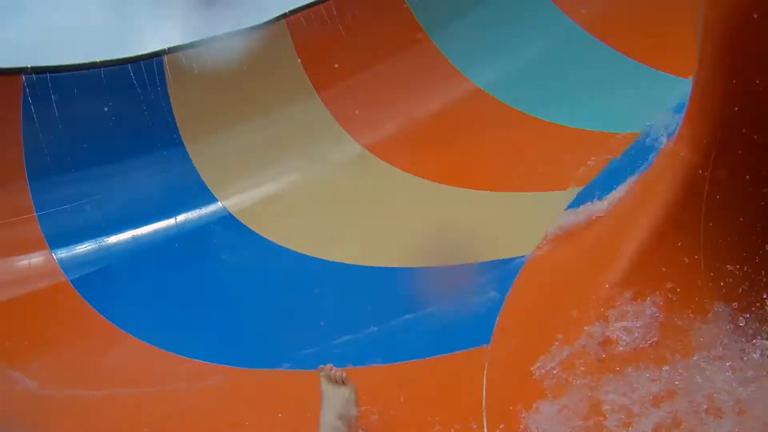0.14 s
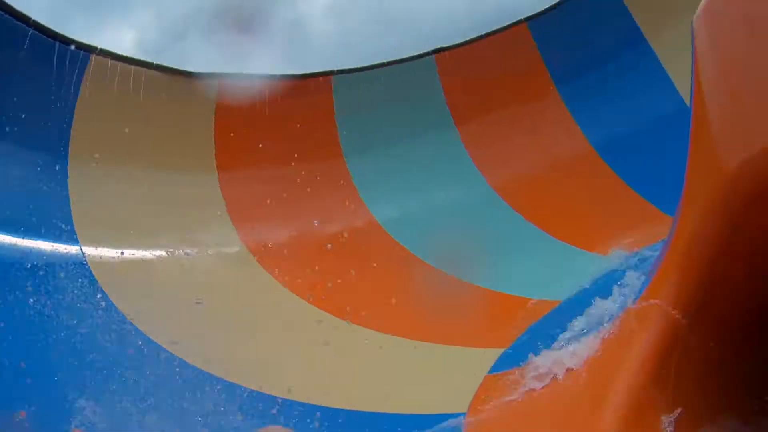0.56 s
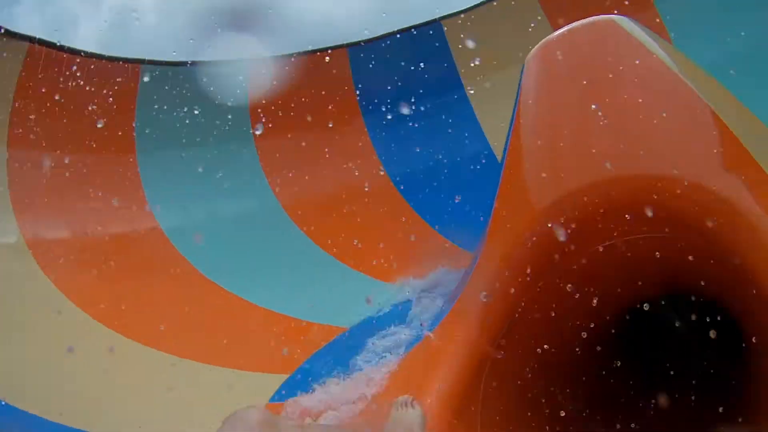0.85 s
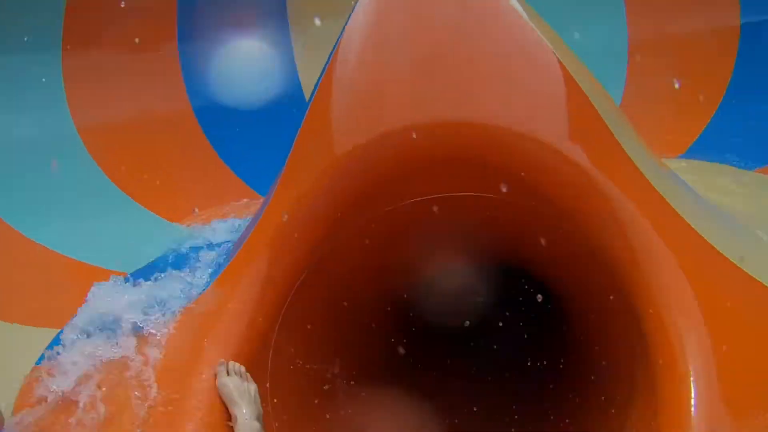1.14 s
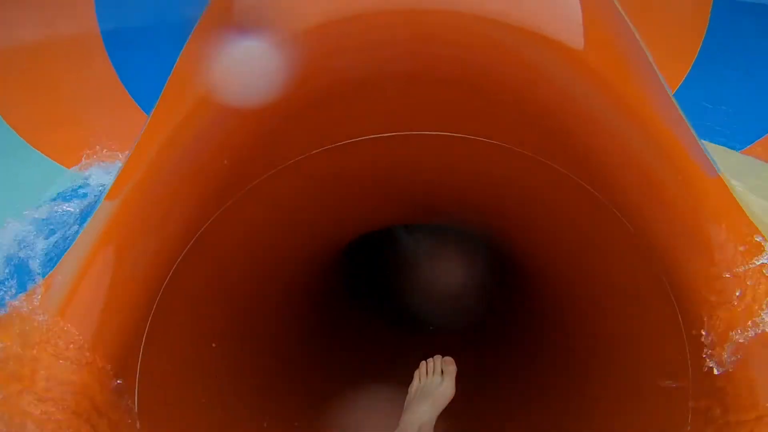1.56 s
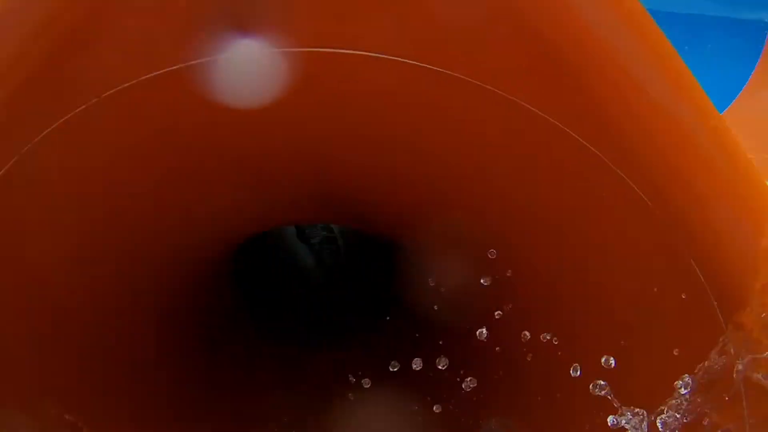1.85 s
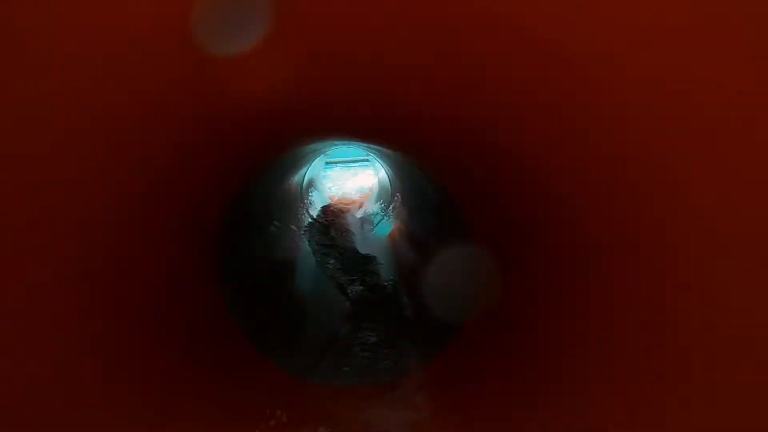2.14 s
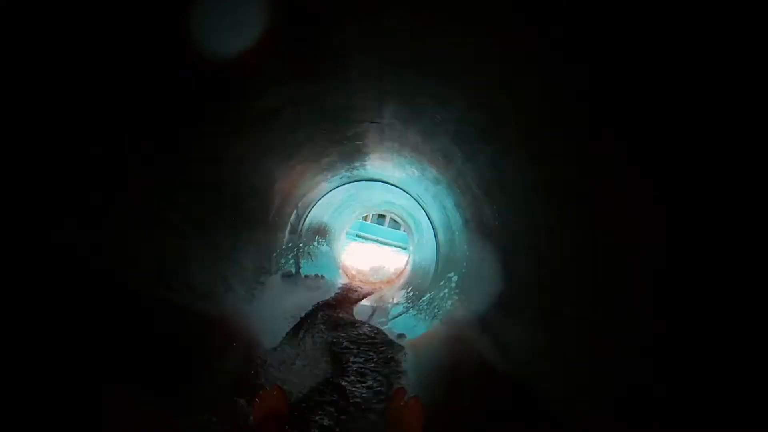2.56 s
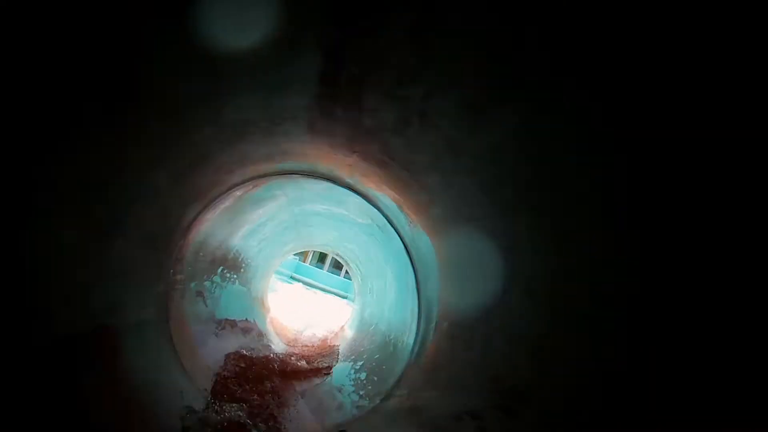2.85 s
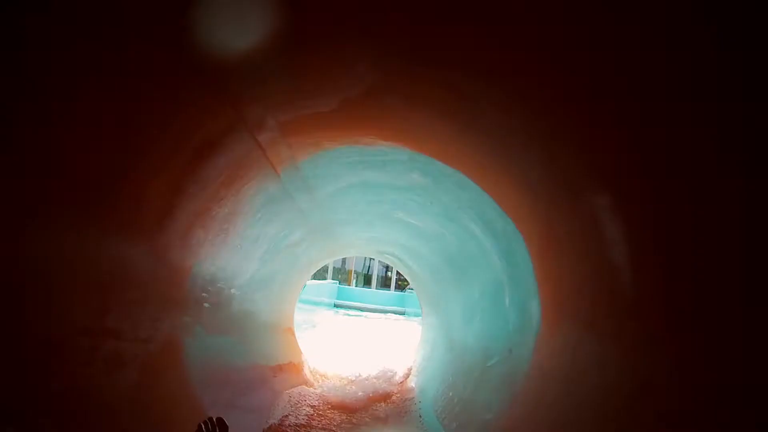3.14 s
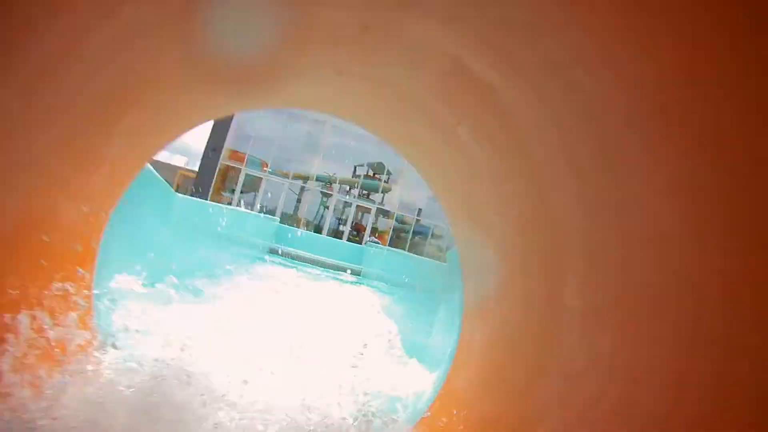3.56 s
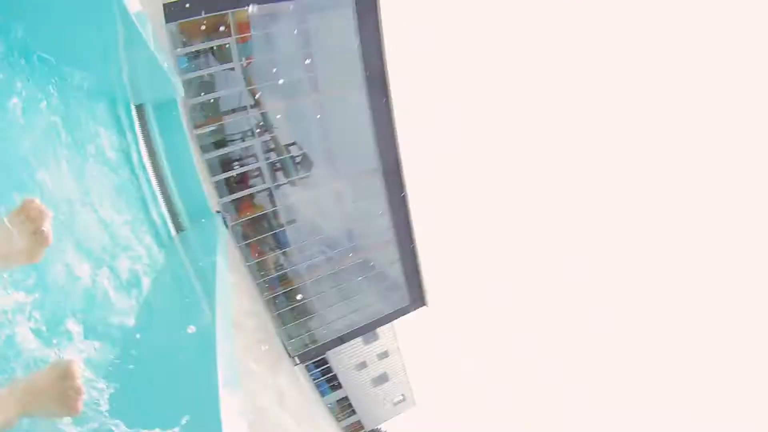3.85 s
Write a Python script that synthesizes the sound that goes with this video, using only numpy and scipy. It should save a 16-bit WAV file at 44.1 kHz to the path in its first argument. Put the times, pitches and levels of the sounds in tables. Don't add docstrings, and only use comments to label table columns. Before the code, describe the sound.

Water rushes as a bright, grainy hiss over a duller wash, close in a waterproof camera's microphone. Brief muffled gaps and soft thumps come around 0.2-0.4 s, with tiny ticks near 0.7-1.3. From 1.6 the rush swells, chopped by gurgling dropouts, densest at 2.0-2.4. It steadies, surges sharply at 3.4, then hard popping splashes crackle at 3.75-3.95, leaving muffled, stuttering water.

```python
import sys
import numpy as np
from scipy import signal
from scipy.fft import rfft, irfft, next_fast_len
from scipy.io import wavfile
from scipy.ndimage import uniform_filter1d, map_coordinates

SR = 44100
rng = np.random.default_rng(int(sys.argv[2]) if len(sys.argv) > 2 else 0)


def transcribe(u):
    v = np.clip(np.atleast_2d(u).T, -1, 1)
    q = np.round(v * 32767).astype(np.int16)
    wavfile.write(sys.argv[1], SR, q)


def linear_from_db(decibels):
    return 10 ** (np.asarray(decibels, float) / 20)


N = 176400
TOP_HZ = 14050

# center_hz, width_hz, lift_db
FLOODED_PORT = [(4300, 900, 1.7), (6600, 2200, 10.4)]


def unit(x):
    return x / np.sqrt(np.mean(x ** 2) + 1e-20)


def along(points, hz):
    point_hz, point_db = np.transpose(points)
    return np.interp(np.log(hz + 1), np.log(point_hz + 1), point_db)


def wobble(rate):
    knots = rng.standard_normal(int(N * rate / SR) + 4)
    return map_coordinates(knots, [np.arange(N) * rate / SR])


def filtered(x, response):
    size = next_fast_len(N + SR // 2)
    return irfft(rfft(x, size) * response(np.fft.rfftfreq(size, 1 / SR)), size)[..., :N]


def gate(rows, in_ms, out_ms):
    t, out = np.arange(N) / SR, np.zeros(N)
    for start_s, length_ms, height in rows:
        end_s = start_s + length_ms / 1000
        near = slice(max(round(start_s * SR) - 400, 0), round(end_s * SR) + 400)
        inside = 1000 * np.minimum((t[near] - start_s) / in_ms, (end_s - t[near]) / out_ms)
        out[near] += height * np.clip(inside + .5, 0, 1)
    return out


def rush():
    # time_s, level_db
    ride_levels = [(0, -53), (.5, -55.5), (1.1, -57), (1.55, -53.5), (1.8, -49.5), (2.0, -45.5),
                   (2.4, -46.5), (2.9, -47.5), (3.2, -50.5), (3.3, -46), (3.422, -47), (3.428, -36.5),
                   (3.482, -39), (3.505, -41), (3.75, -44.5), (3.8, -52.5), (3.86, -55), (4, -52)]
    # freq_hz, level_db
    spray_color = [(1700, -48), (2300, -10.5), (2600, -6.5), (3000, -4.5), (4500, -7.5), (6000, -5.5),
                   (9000, -3), (14000, -11.5)]
    # freq_hz, level_db
    body_color = [(25, -8), (190, -17), (450, -12.5), (900, -12.5), (1450, -9), (1700, -18), (2200, -19),
                  (3500, -99)]
    # center_hz, width_hz, lift_db
    open_port = [(3340, 290, 2), (5473, 790, 12), (6785, 310, 8), (9130, 2200, 2.5)]
    landing_s = 3.756
    fizz_per_s, fizz_db, fizz_spread_db = 900, -9.5, 6

    t = np.arange(N) / SR
    level_db = np.interp(t, *np.transpose(ride_levels)) + .5 * wobble(5.14) + 1.3 * wobble(30.33)
    loss_db = film_loss_db() * (1 + 0.17 * wobble(150))

    grain_size = linear_from_db(fizz_spread_db * np.minimum(rng.exponential(size=N), 3))
    fizz = (rng.random(N) < fizz_per_s / SR) * rng.standard_normal(N) * grain_size
    source = unit(patchy(patchy_db=1.0)) + linear_from_db(fizz_db) * unit(fizz)

    def through(modes):
        return unit(filtered(source, lambda f: linear_from_db(along(spray_color, f)) * port(f, modes) * (f < TOP_HZ)))

    spray = np.where(t < landing_s, through(open_port), through(FLOODED_PORT))
    body = unit(filtered(patchy(patchy_db=1.5), lambda f: linear_from_db(along(body_color, f))))
    spray, body = hollowed(np.array([spray, body]))

    body_db = -65 + 0.88 * (level_db + 49) + 0.42 * wobble(16)
    return linear_from_db(level_db - loss_db) * spray + linear_from_db(body_db - 0.48 * loss_db) * body


def patchy(patchy_db):
    z = signal.stft(rng.standard_normal(N + 512), nperseg=256)[2]
    field = uniform_filter1d(uniform_filter1d(rng.standard_normal(z.shape), 5, 0), 12, 1)
    return signal.istft(z * linear_from_db(patchy_db * unit(field)), nperseg=256)[1][:N]


def port(f, modes):
    ringing = 0
    for center, width, lift_db in modes:
        ringing = ringing + np.abs(linear_from_db(lift_db) - 1) * 1j * f * width / (center ** 2 - f * f + 1j * f * width)
    return 1 + ringing


def hollowed(x):
    center_hz, span_hz, depth_db, rarity = 2046, 466, -40, .75
    hz, _, z = signal.stft(x, SR, nperseg=1024)
    noise = rng.standard_normal(z.shape[-2:])
    field = unit(uniform_filter1d(uniform_filter1d(noise, size=3, axis=0), size=7, axis=1))
    band = np.exp(-((hz[:, None] - center_hz) / span_hz) ** 4)
    dips_db = depth_db * band * np.clip(2 * (field - rarity), 0, 1)
    return signal.istft(z * linear_from_db(dips_db), SR, nperseg=1024)[1][..., :N]


def film_loss_db():
    # start_s, length_ms, loss_db
    slide_seals = [(.233, 13.7, 24), (.262, 33.2, 34), (.279, 11.4, 17), (.4, 3.1, 18), (1.596, 7.4, 17),
                   (1.626, 25, 25), (1.631, 16.8, 32), (1.675, 9.8, 19.5), (2.006, 12.4, 21.5),
                   (2.037, 22.2, 36), (2.052, 5.5, 49), (2.06, 17, -5.5), (2.08, 17.6, 24.5),
                   (2.205, 5.8, 21), (2.25, 21.9, 32), (2.277, 34, 23), (2.2805, 31, 90), (2.329, 30, 26),
                   (2.331, 14.3, 110), (2.3495, 11.2, 110), (2.392, 7.7, 20), (2.437, 6.5, 15.5),
                   (2.646, 12.2, 17)]
    # start_s, length_ms, loss_db
    exit_seals = [(3.576, 5.5, 24), (3.642, 6.6, 22), (3.676, 8.6, 30), (3.696, 14, 29.5), (3.731, 4, 10),
                  (3.752, 1.5, 16), (3.788, 7, 12), (3.797, 29, 20), (3.807, 14, 70), (3.825, 2.8, 24),
                  (3.836, 3, 25), (3.894, 9.7, 32), (3.904, 6.7, 18), (3.908, 34, 34), (3.917, 7, 25),
                  (3.93, 6, 40), (3.777, 4.9, 6), (3.944, 18.4, 33)]
    return gate(slide_seals + exit_seals, in_ms=1.45, out_ms=.4)


def membrane():
    # time_s, peak_db, width_ms
    clearings = [(0.248, -44, 1.3), (.398, -47, 2.5), (0.643, -50.5, 4), (1.1788, -53, 1.5),
                 (1.2304, -45.5, 4), (1.2344, -57, 0.091), (1.3, -43.5, 5.7), (1.3798, -47, 2.7),
                 (1.5963, -41, 1.05), (1.6048, -48, 4.6), (1.6758, -42, 3.3), (2.019, -37.5, 1.05),
                 (2.031, -36, 3.3), (2.1728, -42, 5.1), (2.212, -38, 2.8), (2.33, -42, 0.87),
                 (2.505, -50, 9.1), (2.55, -59, 2.6), (2.2712, -32, 1), (2.3219, -32, 1.3),
                 (2.6582, -40, 2), (3.0875, -43, 1.9), (3.5827, -38, 2.5), (3.7465, -37.5, 1.3),
                 (3.7625, -29, 0.26), (3.785, -23, 0.31), (3.794, -31, 1.05), (3.8286, -34, 0.66),
                 (3.841, -34, 1.4), (3.849, -26, .7), (3.853, -38, 1.3), (3.8587, -33.5, 1.7),
                 (3.8708, -35, 1.6), (3.893, -23.5, 0.38), (3.94, -37.5, 2.1)]
    # time_s, peak_db, width_ms
    sealings = [(0.17, -48.5, 3.9), (0.233, -35, 0.91), (0.293, -44, 1.5), (0.4009, -47.5, 1.3),
                (1.595, -51, 0.8), (2.3205, -37.5, 0.84), (0.4055, -45, 8.8), (0.7856, -48, 1.1),
                (1.3097, -57, 2), (1.5895, -48, 2.3), (1.652, -43, 0.72), (1.6574, -48.5, 0.52),
                (1.6695, -59, 0.8), (2.0033, -36.5, 2.3), (2.0599, -38, 3), (2.2042, -34, 1.25),
                (2.2383, -39.5, 1.4), (2.4205, -37, 3.6), (2.6452, -31.5, 0.94), (3.0938, -46, 1.8),
                (3.5753, -32.5, 1.1), (3.6342, -28.5, 1.9), (3.6536, -37, 1.9), (3.688, -40.5, 1.3),
                (3.736, -40, 1.2), (3.7634, -32, 0.34), (3.7833, -22, 0.21), (3.787, -23.5, 0.23),
                (3.8504, -32, 1.4), (3.944, -40.5, 0.68), (3.7689, -36, 0.25), (3.774, -34, 0.2),
                (3.8236, -28, 1.25), (3.8333, -35.5, 1.9), (3.8466, -21.5, 0.28), (3.909, -26.5, 1.06)]
    # time_s, peak_db
    soft_pushes = [(0.019, -58), (0.191, -56), (0.263, -53), (0.368, -56), (0.719, -53.5), (0.758, -54),
                   (0.977, -51), (1.626, -49), (1.695, -53), (2.08, -46), (2.099, -49), (2.121, -49.5),
                   (2.445, -46.5), (2.46, -51), (2.54, -47), (2.682, -67), (2.762, -49), (2.983, -54),
                   (3.255, -55.5), (3.266, -50), (3.284, -52.5), (3.611, -47), (3.676, -48), (3.974, -41)]
    push_db, soft_ms = -0.5, 3.9
    slosh_per_s, slosh_db, slosh_ms = 52, -73.5, 4
    gurgle_db, gurgle_ms, gurgle_rate = -4.5, 9.5, 660

    slosh = []
    for when, rarity, width, side in rng.random((round(slosh_per_s * 4), 4)):
        size = np.sign(side - .5) * linear_from_db(slosh_db - 3.7 * np.log(rarity + 0.029))
        slosh.append((4 * when, size, slosh_ms * (0.35 + width)))
    soft = [(s, (-1) ** k * linear_from_db(db + push_db), soft_ms) for k, (s, db) in enumerate(soft_pushes)]
    firm = [(s, linear_from_db(db + push_db), ms) for s, db, ms in clearings]
    pushes = bumps(firm + soft + slosh, rise=9.6, fall=2.2)
    pulls = bumps([(s, -linear_from_db(db), ms) for s, db, ms in sealings], rise=2.13, fall=3.1)

    moved = filtered(pushes, vent(40.8)) + filtered(pulls, vent(72))
    stir = uniform_filter1d(np.abs(moved), round(gurgle_ms * SR / 1000))
    gurgle = linear_from_db(gurgle_db - 0.22 * film_loss_db()) * stir * wobble(gurgle_rate)
    return moved + gurgle


def bumps(rows, rise, fall):
    t, out = np.arange(-500, 900) / SR, np.zeros(N + 1400)
    for time_s, size, width_ms in rows:
        u = t * 1000 / max(width_ms, .3)
        shape = np.where(u < 0, np.exp(-rise * u ** 2), 1 / np.cosh(fall * u))
        out[round(time_s * SR):][:len(t)] += size * shape
    return out[500:N + 500]


def vent(hz):
    damping, top_hz = 0.74, 3020
    ring_hz, ring_width_hz, ring_db = 230, 89, -12

    def response(f):
        escape = -f * f / (hz ** 2 - f * f + 2j * damping * f * hz)
        rounding = 1 / (1 + 1j * f / top_hz)
        resonance = 1j * f * ring_width_hz / (ring_hz ** 2 - f * f + 1j * f * ring_width_hz)
        return escape * rounding * (1 + linear_from_db(ring_db) * resonance)

    return response


def splash():
    # start_s, length_ms, level_db
    bursts = [(3.7575, 2.1, -37.5), (3.7622, 1.9, -37), (3.7656, 5.8, -30.5), (3.7708, 4.2, -28),
              (3.7759, 1.25, -28.5), (3.7817, 1.4, -37), (3.7834, 2, -27.5), (3.7857, 0.89, -21),
              (3.7929, 2, -48), (3.823, 1.8, -48), (3.831, 1.5, -39.5), (3.8419, 1.2, -33),
              (3.847, 1.8, -40), (3.8513, 2.5, -43.5), (3.907, 2.5, -54), (3.9392, 3.6, -50.5)]
    # freq_hz, level_db
    burst_color = [(100, -30), (500, -5.5), (1250, 2.5), (2300, -8), (4500, -5), (8000, -8.5),
                   (14000, -11.5)]
    spike_db = 2.5
    spiky = unit(rng.standard_normal(N) * linear_from_db(spike_db * np.tanh(wobble(1500))))
    water = unit(filtered(
        spiky, lambda f: linear_from_db(along(burst_color, f)) * port(f, FLOODED_PORT) * (f < TOP_HZ)))
    return water * gate([(s, ms, linear_from_db(db)) for s, ms, db in bursts], in_ms=0.36, out_ms=0.91)


def drops():
    # time_s, peak_db, pitch_hz, cycles_to_peak
    hits = [(.742, -41.5, 6200, 2), (0.7843, -44.5, 3200, 0.92), (0.7835, -49.5, 1130, 0.4),
            (.7836, -46, 5600, 1), (.812, -58, 1550, 2), (.885, -57, 1640, 2.2), (1.003, -59, 1450, 2),
            (1.004, -37, 9500, 0.63), (1.0868, -34, 6600, .7), (1.226, -57, 1470, 2),
            (1.174, -54.5, 272, 1.05), (1.297, -44.5, 164, 0.47), (1.318, -52, 2930, 2.3),
            (2.2, -48.5, 220, 1), (2.36, -55, 150, .7), (3.084, -48.5, 272, .8), (3.431, -50.5, 1014, 4.4),
            (3.505, -58, 222, 2.2), (3.661, -46, 1470, 3.2), (3.849, -33, 1400, 1.5),
            (3.989, -43.5, 4300, 1.7), (3.989, -49, 1500, 2)]
    t, out = np.arange(3000) / SR, np.zeros(N + 3000)
    for time_s, peak_db, pitch_hz, peak in hits:
        cycles = t * pitch_hz
        envelope = cycles / peak * np.exp(1 - cycles / peak)
        out[round(time_s * SR):][:len(t)] += linear_from_db(peak_db) * np.sin(2 * np.pi * cycles) * envelope
    return filtered(out[:N], lambda f: f < TOP_HZ)


def scene():
    mono = rush() + membrane() + splash() + drops()
    return np.array([mono, mono])


def low_pass(x):
    return signal.sosfilt(signal.butter(12, 15280, fs=SR, output="sos"), x)


def record(dry):
    ceiling, edge_db_per_khz = .13, 20
    limited = ceiling * np.tanh(dry / ceiling)
    mix = filtered(limited, lambda f: linear_from_db(-edge_db_per_khz * np.maximum(f - TOP_HZ, 0) / 1000))
    return low_pass(mix)


dry = scene()
out = record(dry)
transcribe(out)
```